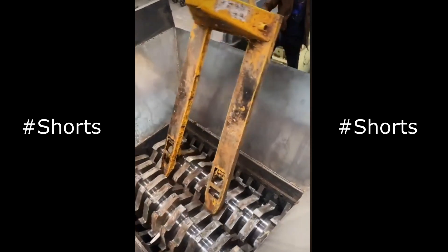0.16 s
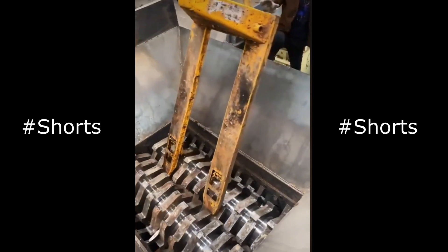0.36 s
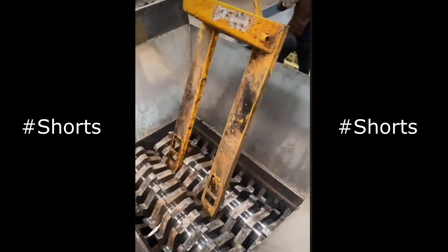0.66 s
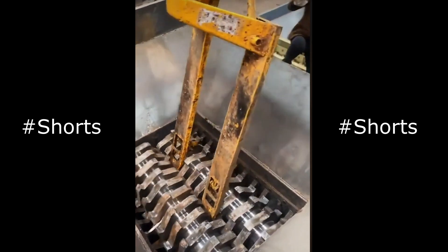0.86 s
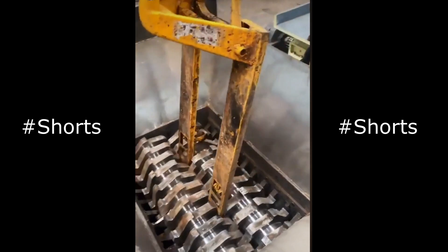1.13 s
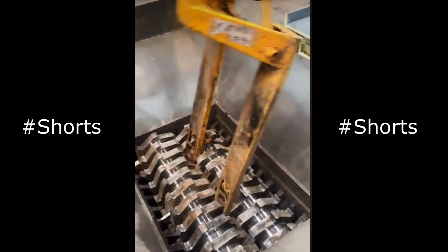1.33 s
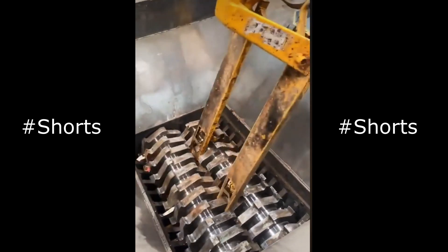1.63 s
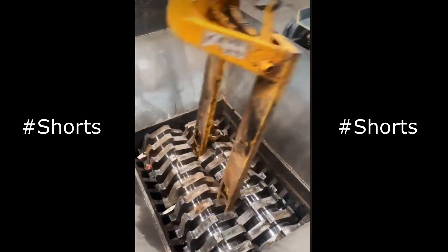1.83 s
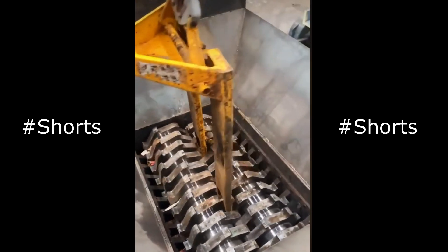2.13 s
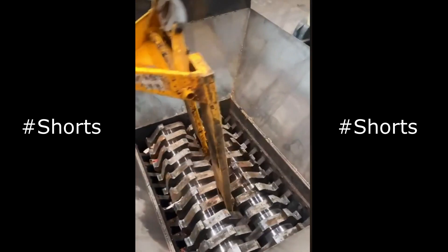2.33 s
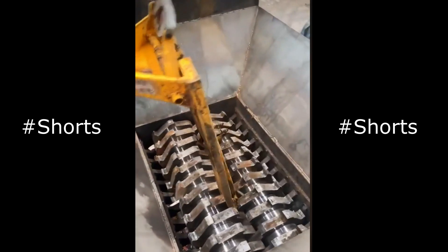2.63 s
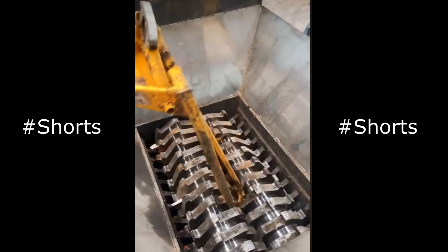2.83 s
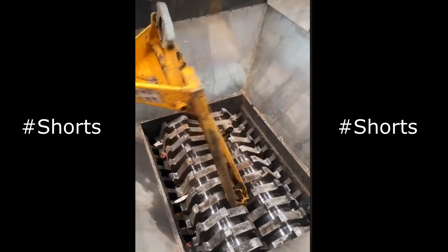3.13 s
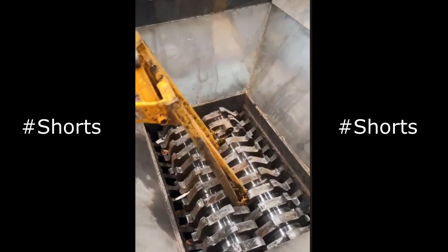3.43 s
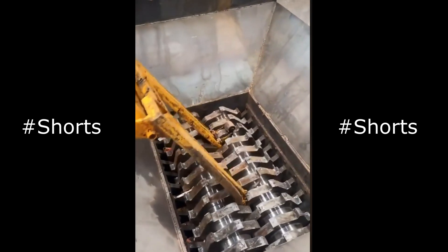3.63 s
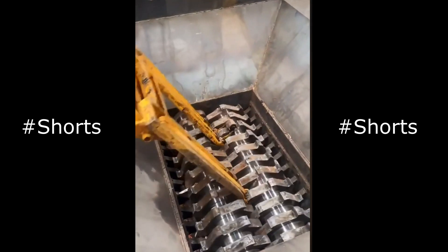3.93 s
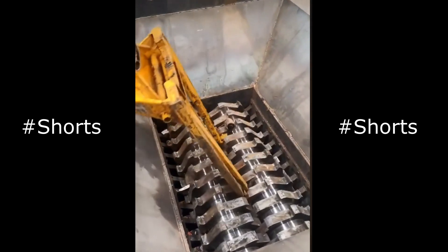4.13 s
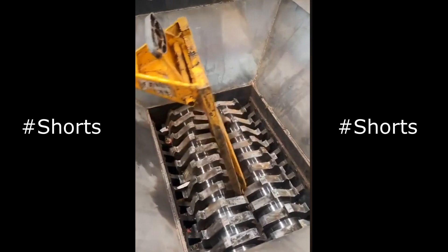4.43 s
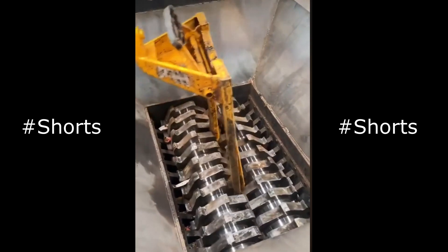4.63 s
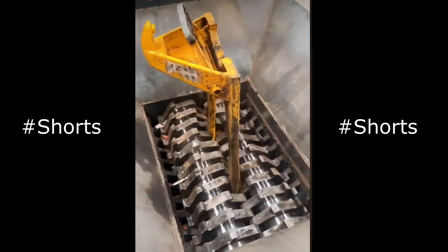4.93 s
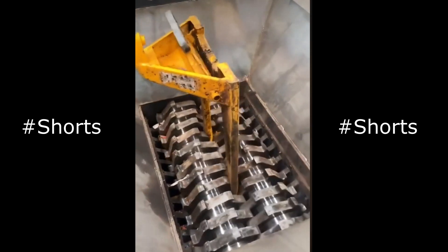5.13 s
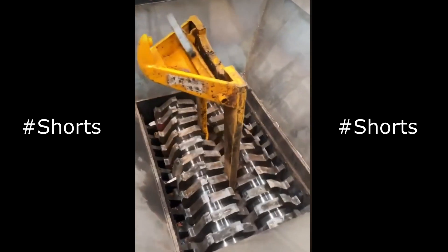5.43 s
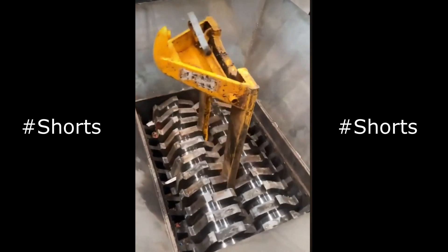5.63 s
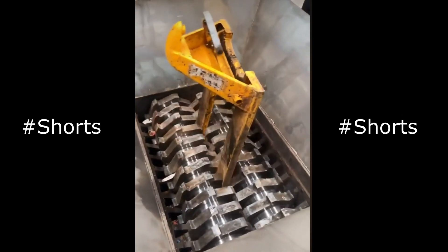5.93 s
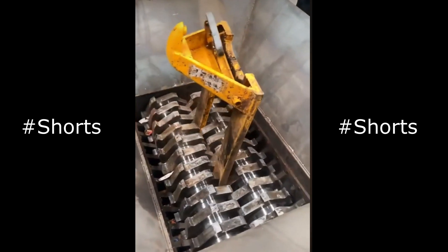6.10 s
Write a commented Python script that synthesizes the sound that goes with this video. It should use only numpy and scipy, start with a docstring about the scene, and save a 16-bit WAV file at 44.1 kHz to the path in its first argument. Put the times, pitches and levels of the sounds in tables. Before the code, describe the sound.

Steel grinds, crunches and snaps in a shredder's teeth over a low motor rumble, then squeals as it drags along a cutter.

```python
"""Juddering and scraping steel, close up: a twin-shaft shredder is chewing the forks of a pallet jack,
heard through a phone's two microphones at the rim of its sheet-steel hopper. Teeth grab and slip,
shaking the frame; steel snaps with short clanging rings and screeches. After a heavy crunch a fork
drags along a cutter and squeals as friction keeps its modes sounding. The drive rumbles underneath,
and the hopper walls throw quick echoes at the microphones from all sides."""
import sys
import numpy as np
from scipy import signal
from scipy.fft import rfft, irfft, next_fast_len
from scipy.io import wavfile
from scipy.ndimage import uniform_filter1d

SR = 44100
rng = np.random.default_rng(int(sys.argv[2]) if len(sys.argv) > 2 else 0)


def store_wav(level_fs):
    """Save 16-bit WAV to argv[1]."""
    pcm = np.round(np.clip(np.atleast_2d(level_fs), -1, 1) * 32767)
    wavfile.write(sys.argv[1], SR, pcm.T.astype(np.int16))


N = 276242
T = np.arange(N) / SR
LEAD_S = .03  # strain builds this long before a break or a screech


# a tooth bites and holds: (start [s], end [s], frame judder [dB], scraping [dB], fine chips [dB])
TOOTH_BITES = [(0, 0.174, -28, -35.5, -39), (0.187, 0.356, -24.5, -37, -49.5),
               (0.349, 0.815, -27, -46.5, -70), (0.849, 1.05, -27, -37.5, -42),
               (1.06, 1.354, -29.5, -48, -56.5), (1.467, 1.509, -29, -44, -49),
               (1.592, 1.707, -34, -41.5, -49), (1.803, 1.841, -32.5, -41, -42.5),
               (2.196, 2.382, -61, -60, -61), (2.442, 2.564, -65, -63, -59.5),
               (2.585, 2.609, -30, -36.5, -63.5), (2.705, 3.009, -37.5, -43, -48),
               (3.626, 3.648, -35, -46.5, -47), (3.687, 3.816, -48, -59.5, -56),
               (3.833, 4.183, -50.5, -62.5, -58.5), (4.446, 4.564, -41, -47, -48),
               (4.983, 5.054, -47, -58, -52), (5.112, 5.35, -17.5, -37.5, -59),
               (5.458, 5.852, -43.5, -62, -48), (5.864, 6.267, -35.5, -54.5, -57)]
# a fork slides over a cutter: (peak [s], swell and fade [s per 20 dB], scraping [dB], fine chips [dB])
FORK_SLIDES = [(0.528, 0.08, -36, -33.5), (0.678, 0.31, -42.5, -43), (0.93, 0.0641, -24.5, -22.5),
               (1.477, 0.77, -54, -51), (2.231, 0.3, -58, -51), (2.941, 0.0943, -34.5, -39.5),
               (3.569, 0.2, -59, -55), (3.73, 0.42, -68, -59.5), (4.035, 0.7, -66, -77),
               (4.12, 0.31, -58, -79), (4.27, 0.6, -71.5, -59), (4.952, 0.35, -59, -56),
               (5.45, 0.15, -40, -36.5), (5.785, 0.1631, -36, -29), (6.25, 0.04, -40, -78)]
# colours of the frame, scraping and chip hiss: (frequency [Hz], relative level [dB])
FRAME_COLOUR = [(40, -18), (90, -8), (145, 3.5), (230, 1.5), (290, -7), (400, -2), (520, -7.5),
                (750, -20.5), (1100, -29.5), (1600, -18.5), (2600, -66), (6000, -67)]
SCRAPE_COLOUR = [(200, -13.5), (450, 0.5), (650, 4), (900, 2), (1300, 5.5), (1850, 0), (2400, -2.5),
                 (3300, -3.5), (4300, -14.5), (6000, -9), (12000, -41)]
HISS_COLOUR = [(2000, -41), (3500, 15), (5000, -6.5), (6400, 9.5), (7300, 0.5), (8300, -1.5), (10000, -4.5),
               (12500, -6.5), (14000, -3), (16000, -2)]

def grinding(grab_db=2, lurch_db=.67, light_hold_db=-56):
    """Down in the hopper, teeth grab and slip: the frame shakes, forks scrape, chips make them tinkle."""
    start, end, *levels = np.transpose(TOOTH_BITES)
    judder, scrape, chips = (swells(start, end, db, attack_s=.0093, release_s=.048) for db in levels)
    peak, fade, *levels = np.transpose(FORK_SLIDES)
    slide_scrape, slide_chips = (swells(peak, peak, db, fade, fade) for db in levels)
    # the constant floors are the cutters turning free
    judder = np.hypot(judder, undb(-55))
    scrape = np.sqrt(scrape ** 2 + slide_scrape ** 2 + undb(-77) ** 2)
    chips = np.sqrt(chips ** 2 + slide_chips ** 2 + undb(-84.5) ** 2)
    loose = 1 / (1 + scrape / undb(light_hold_db))  # a lightly held fork touches only now and then
    grab = walk(40)
    swell = undb(.3 * walk(9) - loose * (walk(8.4) - 2))
    scrape, chips = scrape * swell, chips * swell
    frame = through(slips(900, 3.04) * judder * undb(lurch_db * grab), response(FRAME_COLOUR))
    groan, jerks = chatter()
    crumbs = undb(-10) * slips(110, 3)
    grain = unit(slips(1900, 3.2) + crumbs)
    scraping = through(grain * scrape * undb(grab_db * grab) + jerks, response(SCRAPE_COLOUR))
    hiss = through(slips(2000, 2.5) * chips * undb(grab_db * grab - 3), response(HISS_COLOUR))
    grit = 0
    for _ in range(2):
        grains = slips(700, 2) * chips * (1 - loose) ** 2 * undb(grab_db * walk(25) - 3)
        grit += through(grains, tinkle())
    return frame + groan + rubbed(scraping + hiss) + grit


# steel giving way: (time [s], crack [dB], thud [dB], splinters [dB], strongest pitch [Hz],
# crumbling time [s], brightness [dB per octave])
STEEL_SNAPS = [(.149, -19, -24.5, -15, 1800, 0.0026, 0), (0.154, -22.5, -27.5, -19.5, 630, 0.0028, 3.5),
               (.193, -12, -21.5, -21, 1300, 0.0026, 1), (.273, -18.5, -29.5, -15.5, 3400, 0.0026, 5.5),
               (.278, -13, -40, -19.5, 1400, 0.0037, -4), (0.855, -29.5, -29, -27, 1380, 0.013, 11.5),
               (0.902, -26, -18.5, -18, 800, 0.0075, 7), (1.085, -20.5, -31.5, -26.5, 3100, 0.031, 6),
               (1.121, -17, -38, -30, 3720, .002, 5.5), (1.511, -14, -21, -17, 1700, 0.006, -0.5),
               (1.593, -31, -24.5, -27.5, 805, 0.0089, -12.5), (1.606, -16.5, -26, -28.5, 641, 0.0103, 0),
               (1.636, -21.5, -17, -21, 1741, 0.0071, 7), (1.673, -31.5, -20.5, -37, 480, .004, -10.5),
               (1.704, -29, -19, -34, 870, 0.0072, -4), (1.772, -24, -16.5, -30.5, 1725, .017, -2.5),
               (1.84, -26.5, -20.5, -35.5, 648, 0.0045, -8), (2.275, -42.5, -51.5, -57.5, 1236, 0.003, 3.5),
               (2.552, -35, -47.5, -38, 1480, .018, -0.5), (2.590, -9, -16.5, -16.5, 2900, 0.0037, 1.5),
               (2.598, -18.5, -23.5, -23.5, 760, 0.0043, -1), (2.712, -14.5, -19, -26.5, 642, 0.016, 7),
               (2.943, -9, -25, -28, 630, 0.0034, -3), (2.987, -16, -27, -26, 2420, .008, 1),
               (3.614, -15, -21.5, -43, 1400, 0.0034, -1), (4.031, -41.5, -40, -68, 654, 0.0081, -16),
               (4.099, -44.5, -33.5, -71, 748, 0.01, -13), (4.454, -22, -24.5, -40, 1836, 0.0092, 3),
               (4.586, -22.5, -24.5, -35.5, 607, 0.0099, -3.5), (4.988, -31.5, -30.5, -59, 1970, 0.01, -3),
               (5.363, -13, -37, -26, 3400, .008, 8.5), (5.376, -16, -44, -17, 1700, 0.0034, 1.5),
               (6.171, -25, -42, -57, 1253, 0.0053, -0.5)]
# colours of the crack and of the frame's thud: (frequency [Hz], relative level [dB])
CRACK_COLOUR = [(150, -35), (400, -9.5), (650, 5.5), (1000, 0.5), (1400, 1.5), (1850, 7), (2700, -0.5),
                (3700, 2), (5000, -11), (8000, -31), (15000, -24.5)]
THUD_COLOUR = [(50, -13), (110, -9), (190, -1.5), (290, 3), (400, -3), (600, -10), (1000, -23.5),
               (3000, -32.5)]

def snaps(clang_db=-7, tinkle_db=-4, focus_octaves=.34, uneven_db=3, clean_break_s=.0026):
    """Below the rim, each snap cracks, thumps the frame, spits splinters and clangs the forks."""
    out = np.zeros(2 * N)
    grid_hz = np.geomspace(100, 16000, 80)
    octaves = np.clip(np.log2(grid_hz / 1500), -2, 2)
    for s, crack_db, thud_db, splinter_db, hz, crumble_s, brightness in STEEL_SNAPS:
        focus = np.exp(-.5 * (np.log2(grid_hz / hz) / focus_octaves) ** 2)
        tilt = brightness * octaves
        weights_db = np.interp([m[0] for m in FORK_MODES], grid_hz, 9 * focus + tilt)
        force = undb(crack_db) * fracture(crumble_s, clean_break_s / crumble_s, rise_s=.1 * crumble_s)
        uneven = uneven_db * rng.standard_normal(len(grid_hz))  # each contact point resonates its own way
        crack = response(np.c_[grid_hz, shape(CRACK_COLOUR, grid_hz) + 6.5 * focus + tilt + uneven])
        splinters = response(np.c_[grid_hz, shape(HISS_COLOUR, grid_hz) + uneven])
        hit = through(force, crack)
        hit += undb(clang_db) * through(force, fork_clang(weights_db))
        hit += undb(thud_db) * through(fracture(.021, rise_s=.012), response(THUD_COLOUR))
        hit += undb(splinter_db) * through(fracture(crumble_s, rise_s=.0021), splinters)
        hit += undb(splinter_db + tinkle_db) * through(fracture(crumble_s), tinkle())
        add_at(out, s - LEAD_S, hit)
    return out[:N]


def fracture(crumble_s, big_break=0, rise_s=.0026, scatter_db=3, strain_s=.0064, size=16384):
    """Tiny cracks gather under strain, then a run of them dies away, led by an optional big break."""
    t = T[:size] - LEAD_S
    after = np.maximum(t, 0)
    crumbling = (1 - np.exp(-after / rise_s)) * np.exp(-after / max(crumble_s, .001))
    envelope = crumbling + .17 * np.exp(-abs(t) / strain_s)
    cracks = envelope * rng.choice([-1, 1], size) * undb(scatter_db * rng.standard_normal(size))
    cracks /= np.linalg.norm(cracks)
    cracks[int((LEAD_S + rise_s) * SR)] += big_break
    return cracks * np.linalg.norm(envelope)


# free ring of the forks: (frequency [Hz], relative level [dB], time to fall 60 dB [s])
FORK_MODES = [(654, 6.5, 0.15), (918, 9.5, 0.11), (1098, -1.5, 0.068), (1543, 1, 0.079), (1860, 6.5, 0.504),
              (2040, -2.5, .12), (2270, -18, 0.64), (2700, 5, 0.17), (2990, 3.5, 0.42), (3263, 3, 0.59),
              (3470, -10.5, 0.52), (3880, -6, 0.1), (3803, 4, 0.053), (4400, -13, 0.65), (5646, -3.5, 0.6),
              (6020, -3.5, 0.15), (6250, -3, 0.22), (7060, -9.5, 0.12), (7330, -9, 0.16),
              (8090, -12.5, 0.3), (8700, -15, .45), (9310, -17, 0.31), (10700, -20.5, 0.36),
              (11542, -17.5, 0.18), (14000, -18, 0.23), (15510, -18, .25)]

def fork_clang(weights_db, gripped_t60=.054, size=16384):
    """Short clang of forks held by the teeth; the place of contact weights the modes."""
    t = T[:size]
    clang = 0
    for (hz, db, t60), weight_db in zip(FORK_MODES, weights_db):
        decay = np.exp(-np.log(1000) * t * (1 / t60 + 1 / gripped_t60))
        clang += undb(db + weight_db) * decay * np.sin(2 * np.pi * hz * t)
    return clang / np.linalg.norm(clang)


def rubbed(scraping, modes_db=2, width_hz=75, roam_db=5):
    """Scraping travels along the forks: as the contact roams, one damped mode after another stands out."""
    out = scraping
    for hz, _, _ in FORK_MODES:
        contact = undb(modes_db + roam_db * np.clip(walk(20), -2, 1))
        out = out + resonate(scraping * contact, hz, width_hz)
    return out


def tinkle(above_hz=5000, spread_db=4):
    """Fine grit is too light to move the low modes of the forks; it rings only the high ones."""
    hz = np.array([m[0] for m in FORK_MODES])
    weights_db = np.where(hz > above_hz, spread_db * rng.standard_normal(len(hz)), -np.inf)
    return fork_clang(weights_db, gripped_t60=.15)


# a fork springs free: (time [s], frequency [Hz], peak level [dB], time until gripped again [s])
FREE_RINGS = [(1.12, 8070, -41, .2), (1.514, 1820, -22, 0.029), (1.514, 3210, -28.5, .06),
              (1.514, 6400, -24.5, .06), (1.607, 1840, -23, 0.096), (1.636, 6320, -27, 0.027),
              (1.775, 1833, -29.5, 0.35), (2.592, 2290, -30.5, 0.1), (2.592, 4340, -23, .1),
              (2.99, 2885, -36, 0.3), (2.99, 6400, -43.5, 0.15), (2.99, 9475, -39.5, 0.041),
              (4.99, 8096, -55, .15), (5.375, 3386, -13, 0.037)]

def rings(grip_s=.0073):
    """Released by the teeth, a mode rings on, buzzing against them until they grip it again."""
    out = np.zeros(2 * N)
    modes_hz, _, modes_t60 = np.transpose(FORK_MODES)
    for s, hz, db, free_s in FREE_RINGS:
        tone = rough_tone(hz, rough=.33, width_hz=170) / np.sqrt(2)
        t = T[:len(tone)]
        t60 = np.interp(hz, modes_hz, modes_t60)
        fading = np.exp(-np.log(1000) * t / t60 - np.maximum(t - free_s, 0) / grip_s)
        add_at(out, s, undb(db) * fading * tone)
    return out[:N]


# a tooth catches: (start [s], end [s], frequency [Hz], level [dB], roughness [ratio])
# an end before its start makes a knock that stays below the listed level
TOOTH_CATCHES = [(.194, 0.186, 1200, -21.5, .5), (0.197, 0.192, 1950, -19.5, 0.76),
                 (0.217, .232, 5722, -40, .4), (.219, 0.257, 7330, -42, .4),
                 (0.275, 0.267, 1700, -21.5, 0.84), (1.087, 1.118, 2900, -24, 0.48),
                 (1.088, 1.112, 3780, -22, 1.11), (1.115, 1.131, 4000, -15, 0.66),
                 (1.096, 1.129, 7100, -35, 0.66), (1.514, 1.525, 1790, -17.5, 0.38),
                 (1.513, 1.504, 2706, -13.5, .4), (1.607, 1.615, 642.4, -23.5, 0.5),
                 (1.611, 1.615, 6250, -23, 0.48), (1.632, 1.641, 3340, -24, .8),
                 (1.694, 1.76, 15700, -39, 0.4), (1.813, 1.835, 3250, -30.5, 0.58),
                 (2.596, 2.598, 7040, -28.5, 0.5), (2.726, 2.771, 7002, -27, 0.48),
                 (2.986, 2.99, 2740, -26.5, .7), (2.987, 2.995, 7030, -32, 0.5),
                 (2.992, 2.998, 9500, -29.5, .2), (3.614, 3.616, 4000, -19.5, 1),
                 (4.449, 4.56, 3230, -41.5, 0.42), (4.465, 4.557, 8786, -53, .2),
                 (5.369, 5.375, 3418, -6.5, 0.25), (5.364, 5.374, 5700, -20, 1),
                 (5.366, 5.375, 6700, -17, 0.47)]

def screeches(attack_s=.009, release_s=.022, width_hz=500):
    """A catching tooth drives one mode into a brief shriek; the rougher the contact, the wider the line."""
    out = np.zeros(2 * N)
    for start, end, hz, db, rough in TOOTH_CATCHES:
        tone = rough_tone(hz, rough, rough * width_hz, size=8192)
        t = T[:len(tone)] - LEAD_S
        fade_db = 20 * (np.maximum(-t, 0) / attack_s + np.maximum(t - (end - start), 0) / release_s)
        add_at(out, start - LEAD_S, undb(db - fade_db) * tone)
    return out[:N]


# modes that dragging keeps sounding: (frequency [Hz], relative level [dB])
DRAG_MODES = [(1594, -36), (1781, -32.5), (1866, -39), (2530, -36.5), (2692, -43), (3270, -45), (3402, -30),
              (3860, -35), (5125, -33.5), (5230, -31), (5399, -32.5), (5857, -38), (6354, -40),
              (6455, -39.5), (6561, -36), (6701, -35), (7134, -39), (7211, -41), (7800, -40), (8719, -43.5),
              (9362, -48), (9475, -43), (10966, -46.5), (12705, -41), (12980, -46), (13447, -49),
              (13932, -47), (14045, -54), (14142, -53), (14282, -39), (14713, -54), (15402, -50)]
# the fork sings: (start [s], end [s], pitch [Hz], lowest mode [dB], middle modes [dB], shrill modes [dB])
DRAG_SQUEALS = [(5.402, 5.446, 1125, -23, -22.5, -27.5), (5.501, 5.527, 1146, -26.5, -23, -21.5),
                (5.56, 5.697, 1140, -32, -34.5, -29.5), (5.717, 5.758, 1143, -25, -22.5, -29),
                (5.766, 5.804, 1141, -31, -24, -28), (6.222, 6.246, 1140, -34, -27.5, -41.5)]

def squeal(waver=.00164, give=.112, rasp_db=-10, split_hz=4410):
    """The dragged fork sings; pressure bends its lowest mode, the stiffer ones hardly, and makes it rasp."""
    start, end, pitch, *levels = np.transpose(DRAG_SQUEALS)
    low, middle, shrill = (swells(start, end, db, attack_s=.037, release_s=.081) for db in levels)
    low_hz = np.interp(T, (start + end) / 2, pitch)
    bend = 1 + give * (low_hz / np.median(low_hz) - 1) + waver * walk(60)
    middle_modes = [m for m in DRAG_MODES if m[0] < split_hz]
    shrill_modes = [m for m in DRAG_MODES if m[0] >= split_hz]
    low_tone = singing([(1, 0)], low_hz, flutter_db=3.3, rough=.14, width_hz=98)
    middle_tone = singing(middle_modes, bend, flutter_db=2.2, rough=.15, width_hz=90)
    shrill_tone = singing(shrill_modes, bend, flutter_db=3.2, rough=.14, width_hz=90)
    friction = slips(1500, 2.2)
    rasp = sum(undb(db) * resonate(np.roll(friction, int(hz)), hz, 330) for hz, db in middle_modes)
    middle_tone += undb(rasp_db) * middle / middle.max() * unit(rasp)
    shrill_tone *= undb(1.35 * walk(250))
    return low * low_tone + middle * middle_tone + shrill * shrill_tone


# modes of a thin steel edge: (frequency [Hz], relative level [dB])
EDGE_MODES = [(2659, -5.5), (2826, -2), (3117, -10.5), (5604, -2.5), (6045, -11), (7002, -4), (7130, -12.5),
              (9475, -1.5), (10239, -10.5), (10853, -4.5), (13609, -9.5), (15676, -6.5)]
# a tooth on that edge: (start [s], end [s], level [dB])
EDGE_SKIDS = [(2.728, 2.786, -36), (2.78, 2.902, -44), (2.91, 2.977, -38)]

def skid(crackle_db=1.5):
    """Between two snaps a tooth skids along a thin edge with a crackling whistle."""
    bend = 1 + .00035 * walk(85)
    whistle = singing(EDGE_MODES, bend, flutter_db=3, rough=.3, width_hz=200)
    level = swells(*np.transpose(EDGE_SKIDS), attack_s=.019, release_s=.03)
    return level * unit(whistle * undb(crackle_db * walk(500)))


def singing(modes, bend, flutter_db, rough, width_hz):
    """Modes kept sounding by friction: each swells on its own, and slipping smears its line."""
    out = 0
    for hz, db in modes:
        phase = 2 * np.pi * (hz * np.cumsum(bend) / SR + rng.random())
        out += smeared(phase, rough, width_hz) * undb(db + flutter_db * walk(22))
    return unit(out)


def rough_tone(hz, rough, width_hz, size=32768):
    """One rubbed mode of steady pitch."""
    return smeared(2 * np.pi * hz * T[:size], rough, width_hz)


def smeared(phase, rough, width_hz):
    """A sine whose level and phase are shaken by the rubbing contact; rms 1."""
    level_shake, phase_shake = (rough * walk(width_hz, len(phase)) for _ in range(2))
    return unit((1 + level_shake) * np.sin(phase) + phase_shake * np.cos(phase))


# steel jerks over a tooth: (start [s], end [s], jerk rate [Hz], groan [dB], rasp [dB])
JERK_RUNS = [(2.595, 2.6, 185, -22, -37), (2.719, 2.759, 280, -24.5, -34)]

def chatter(jitter=.04, scatter_db=3):
    """Even stick-slip: the frame groans at the rate of the jerks and each jerk rasps the fork."""
    start, end, rate, *levels = np.transpose(JERK_RUNS)
    groan, rasp = (swells(start, end, db, attack_s=.0045, release_s=.016) for db in levels)
    jerk_hz = np.interp(T, np.c_[start, end].ravel(), np.repeat(rate, 2))
    cycles = np.cumsum(jerk_hz * (1 + jitter * walk(150))) / SR
    jerks = unit(np.diff(np.floor(cycles), prepend=0) * undb(scatter_db * walk(200)))
    return groan * np.sqrt(2) * np.sin(2 * np.pi * cycles), rasp * jerks


# rumble of the drive: (time [s], level [dB])
DRIVE_LOAD = [(0, -32.5), (.3, -27.5), (1.3, -36.5), (1.55, -50.5), (1.8, -40.5), (2.4, -39), (3.7, -40.5),
              (4.0, -42.5), (5.05, -43.5), (5.35, -31), (5.39, -55), (6.26, -48.5)]
# its colour: (frequency [Hz], relative level [dB])
DRIVE_COLOUR = [(20, -23.5), (35, -21), (50, 4), (65, 3.5), (95, 4), (135, -2), (190, -6), (260, -17.5),
                (500, -39), (1200, -54.5)]

def drive_rumble(throb_db=2.5):
    """Underneath the cutting, the drive rumbles and throbs with its changing load."""
    load_db = np.interp(T, *np.transpose(DRIVE_LOAD))
    return through(rng.standard_normal(N) * undb(load_db + throb_db * walk(12)), response(DRIVE_COLOUR))


# colour of the short echoes: (frequency [Hz], gain [dB])
ECHO_COLOUR = [(50, -16.5), (180, -12), (380, -3), (700, 2.5), (1150, 2), (1700, -10.5), (2500, -0.5),
               (3600, -9.5), (4700, -23), (6800, -10), (10000, 3.5), (12500, -0.5), (14500, 2)]

def hopper(direct, wall_send_db=0, walls_t60=.0502, hall_t60=.32, hall_db=-23, mic_lag_s=.00011):
    """Two close microphones at the rim: direct sound reaches the left first, wall echoes surround both."""
    to_walls = undb(wall_send_db) * direct
    sway = .7 * walk(2.03)  # the echoes shift as the phone sways

    def echoes(t60):
        t = T[:16384]
        paths = rng.standard_normal((2, len(t))) * np.exp(-np.log(1000) * t / t60) * (t > .002)
        here, there = (through(to_walls, h / np.linalg.norm(h)) for h in paths)
        return np.cos(sway) * here + np.sin(sway) * there
    size = next_fast_len(N + 1000)
    hz = np.fft.rfftfreq(size, 1 / SR)
    side = np.array([[1], [-1]])
    mic_shift = np.exp(1j * np.pi * hz * side * mic_lag_s)
    ahead = rfft(direct + undb(hall_db) * echoes(hall_t60), size) * mic_shift
    walls = undb(-9) * echoes(walls_t60) + side * echoes(walls_t60)
    around = rfft(walls, size) * undb(shape(ECHO_COLOUR, hz))
    return irfft(ahead + around, size)[:, :N]


def undb(db):
    """Decibels to gain."""
    return 10 ** (np.asarray(db) / 20)


def unit(x):
    """Scale to rms 1."""
    return x / np.sqrt(np.mean(x ** 2) + 1e-18)


def shape(colour, hz):
    """A colour's dB at the given frequencies."""
    f, db = np.transpose(colour)
    return np.interp(np.log(hz + 1), np.log(f), db)


def response(colour, size=2048):
    """Causal impulse response of unit energy with the given colour."""
    cepstrum = irfft(np.log(undb(shape(colour, np.fft.rfftfreq(size, 1 / SR)))))
    cepstrum[1:size // 2] *= 2
    cepstrum[size // 2 + 1:] = 0
    h = irfft(np.exp(rfft(cepstrum)))
    return h / np.linalg.norm(h)


def through(x, h):
    """Sound x passed through the response h."""
    return signal.fftconvolve(x, h)[:len(x)]


def resonate(x, hz, width_hz):
    """Sound x passed through one damped mode."""
    return signal.lfilter(*signal.iirpeak(hz, hz / width_hz, fs=SR), x)


def add_at(out, s, sound):
    """Mix a sound in at s seconds."""
    start = max(int(s * SR), 0)
    out[start:start + len(sound)] += sound


def walk(rate_hz, size=N):
    """Smooth random wander of rms 1."""
    hold = max(int(SR / rate_hz), 20)
    steps = rng.standard_normal(size // 20)[:size // hold + 2]
    return unit(uniform_filter1d(np.repeat(steps, hold), hold)[:size])


def slips(per_s, scatter_db):
    """Stick-slip clicks at random moments and of uneven size; rms 1."""
    clicks = (rng.random(N) < per_s / SR) * rng.choice([-1, 1], N)
    return unit(clicks * undb(scatter_db * np.clip(rng.standard_normal(N), -2, 2)))


def swells(starts, ends, levels_db, attack_s, release_s):
    """Summed level of events that rise, hold and fade; attack and release are times per 20 dB."""
    t = T[::16]
    power = 0
    for start, end, db, attack, release in np.broadcast(starts, ends, levels_db, attack_s, release_s):
        fade_db = 20 * (np.maximum(start - t, 0) / attack + np.maximum(t - end, 0) / release)
        power += undb(db - fade_db) ** 2
    return np.interp(T, t, np.sqrt(power))


# the level dips briefly: (time [s], depth [dB], half width [s])
LEVEL_DIPS = [(1.421, -27, 0.021), (5.083, -19, 0.017)]

def scene():
    """Each kind of noise has its own place in the hopper; singing forks stand high and sound more direct."""
    cutting = grinding() + drive_rumble()
    breaking = snaps() + rings()
    shrieking = squeal() + skid() + screeches()
    at_rim = hopper(cutting) + hopper(breaking) + hopper(shrieking, wall_send_db=-7)
    dips_db = sum(db * np.exp(-((T - s) / width) ** 2) for s, db, width in LEVEL_DIPS)
    return at_rim * undb(dips_db)


def record(dry, side_db=-3, top_hz=15850):
    """The phone at the rim narrows the stereo image, rounds the highest peaks and cuts the top."""
    mid = dry.mean(axis=0)
    narrowed = mid + undb(side_db) * (dry - mid)
    return signal.sosfilt(signal.ellip(16, .2, 80, top_hz, fs=SR, output="sos"), np.tanh(narrowed))


dry = scene()
out = record(dry)
store_wav(out)
```